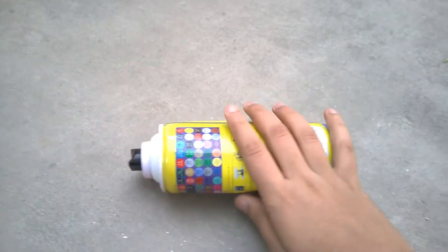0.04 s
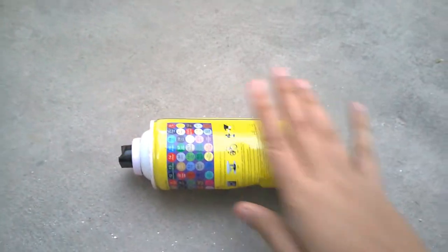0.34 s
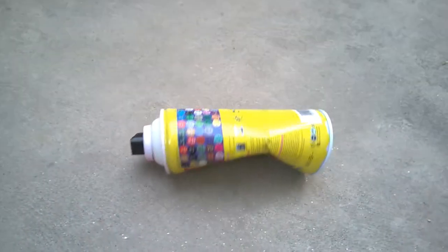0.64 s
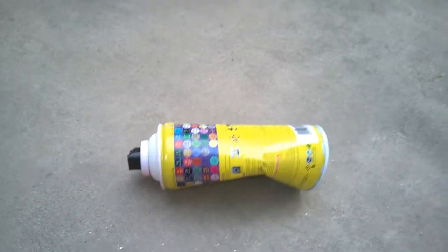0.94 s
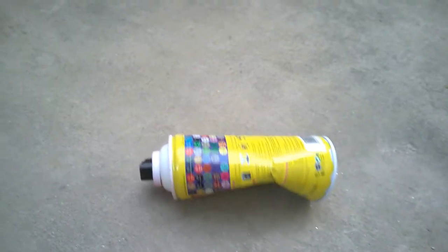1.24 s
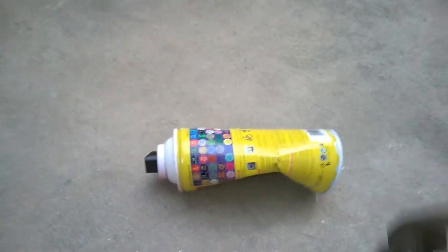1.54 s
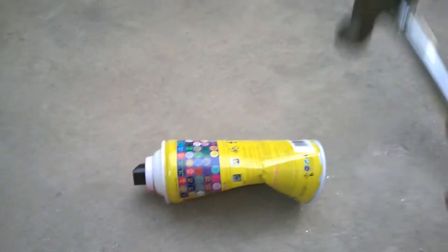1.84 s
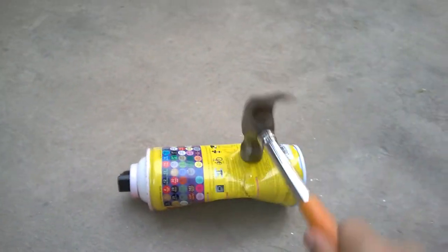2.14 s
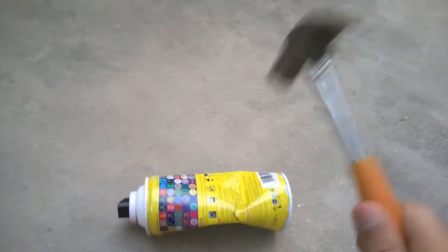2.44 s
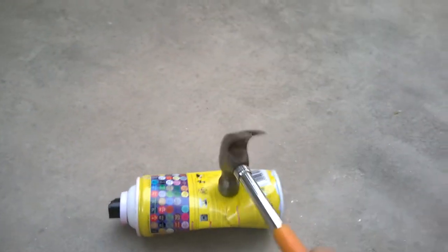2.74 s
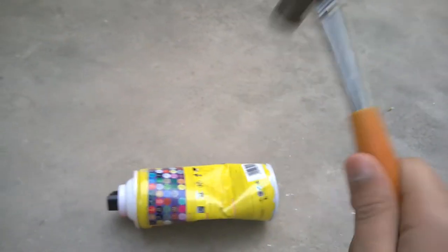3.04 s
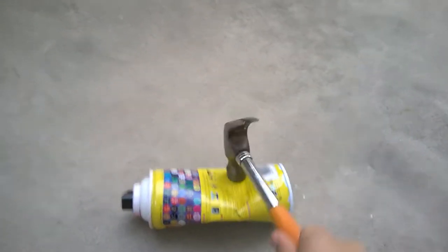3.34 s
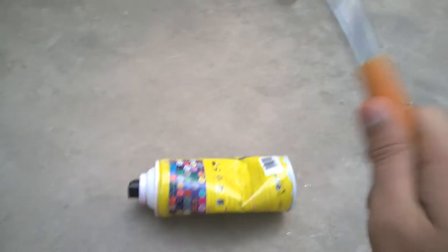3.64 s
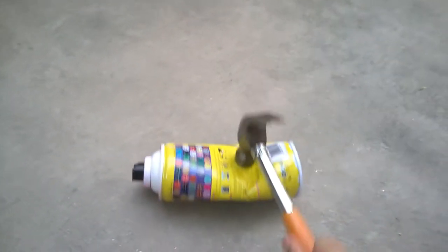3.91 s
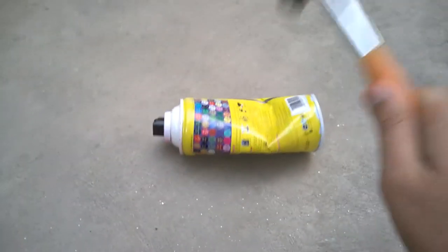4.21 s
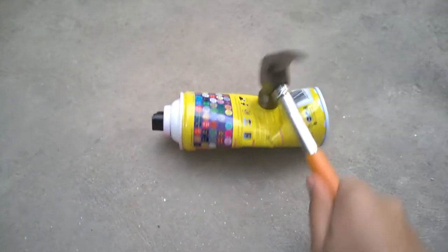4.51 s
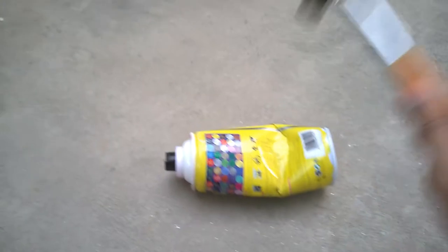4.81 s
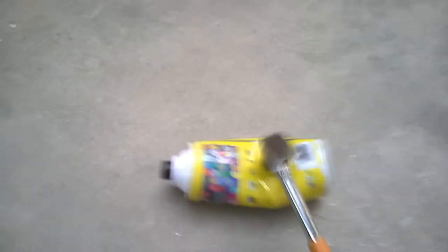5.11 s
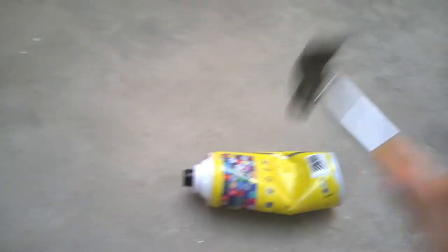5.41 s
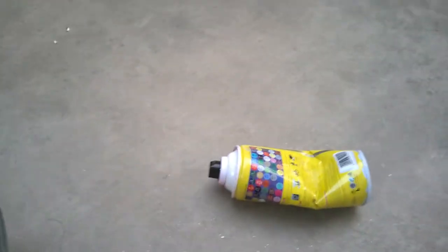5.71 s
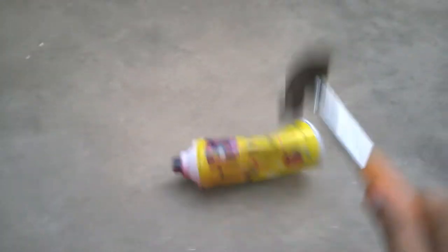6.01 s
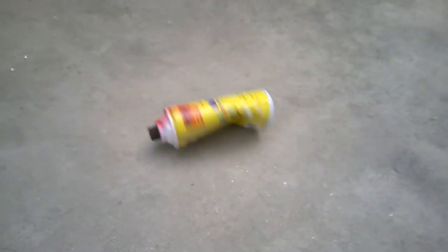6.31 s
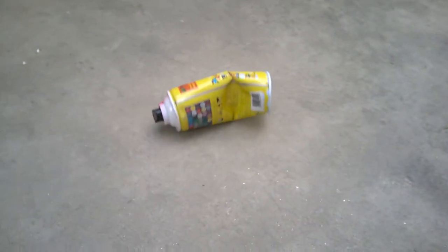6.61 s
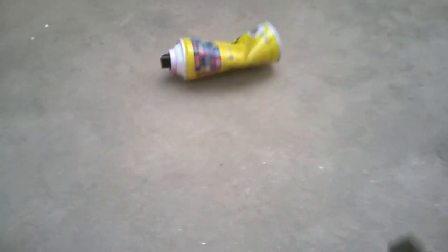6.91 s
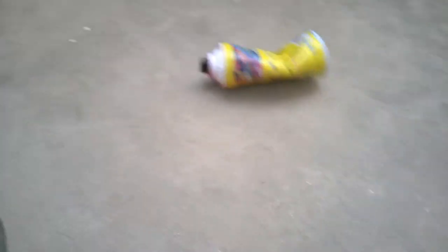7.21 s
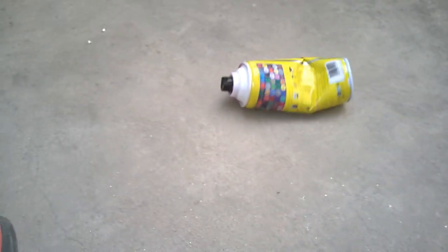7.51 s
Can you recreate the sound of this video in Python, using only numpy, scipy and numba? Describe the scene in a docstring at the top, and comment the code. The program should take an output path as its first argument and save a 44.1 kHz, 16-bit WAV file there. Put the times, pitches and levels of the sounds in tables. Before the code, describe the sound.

Seven close, sharp hammer blows dent a hollow metal spray can on a concrete floor, following a few light clinks as it settles. Each hit clunks and crumples, and the can bounces with a tinny rattle whose ring changes as it is crushed. Finally it rolls and knocks away while a little gas leaks softly. Hard surroundings echo briefly, and a draught rumbles on the microphone throughout.

```python
"""Hammering a spray can

A hammer strikes a nearly empty spray can seven times on concrete, close by. Each blow buckles the thin
wall; the can hops, clatters and at last tumbles away, ringing differently as it is crushed. The last
blow splits it and gas hisses out. Hard walls answer briefly, air rumbles on the microphone, and a
limiter holds the peaks."""
import sys
import numpy as np
from scipy import signal
from scipy.fft import rfft, irfft
from scipy.io import wavfile
from scipy.ndimage import uniform_filter1d, minimum_filter1d
from numba import njit

SR = 44100
rng = np.random.default_rng(int(sys.argv[2]) if len(sys.argv) > 2 else 0)


def bounce(signal):
    """Save signal as a 16-bit WAV file at the path given by the first command-line argument."""
    frames = np.transpose(np.atleast_2d(signal))
    limited = np.clip(frames, -1, 1)
    pcm = np.round(limited * 32767).astype(np.int16)
    wavfile.write(sys.argv[1], SR, pcm)


N = 341775
HIT_N, ATTACK_N = int(0.6 * SR), int(0.02 * SR)
HIT_T = np.arange(HIT_N) / SR

# hammer blows: start_s, crack_db, buckle_db, roar_db, roar_t60_s, thump_db
BLOWS = [(2.1273, -22, -19.5, -16.5, 0.43, -39), (2.6684, -15.5, -23, -17.5, 0.7, -32),
         (3.25, -15.5, -21.5, -12, 0.6, -32), (3.8536, -12.5, -21.5, -13.5, 0.59, -26),
         (4.4850, -19.5, -17.5, -14, 0.54, -31.5), (5.1257, -10, -16.5, -19.5, 1, -41),
         (5.9266, -11.5, -15.5, -21, 0.75, -18.5)]
# spectrum of steel hitting the wall: freq_hz, level_db
CRACK_SPECTRUM = [(60, -24), (160, -19), (400, -6.5), (650, -4), (870, 4), (1100, 4.5), (1400, -2),
                  (2500, -5), (4500, -22.5), (7000, -20), (9500, -40), (15000, -55)]
# spectrum of the shaken can and surroundings: freq_hz, level_db
ROAR_SPECTRUM = [(60, -25.5), (160, -4.5), (400, -9), (600, -5.5), (850, 0.5), (1600, -2), (3000, -3.5),
                 (4800, -11), (7200, -10), (9500, -23), (15000, -37.5)]
# boom of the whole can: pitch_hz, level_db, t60_s
HOLLOW_MODES = [(796, -13.5, 0.071), (888, -10.5, 0.13)]


def hammer_blows(touch_db=-4, buckle_t60_s=0.17, roar_rise_s=0.048, boom_db=-9):
    """Steel cracks on the wall, which folds in a burst of snaps; the can booms, the floor thumps."""
    out = np.zeros(N)
    for start_s, crack_db, buckle_db, roar_db, roar_t60_s, thump_db in BLOWS:
        force = unit_energy(burst(t60_s=0.023))
        force[0] += undb(touch_db)
        folds = clicks(per_s=450, spread_db=12.5) * fade(buckle_t60_s)
        snaps = signal.fftconvolve(folds, burst(t60_s=0.011))[:HIT_N]
        roar = colour(noise(), ROAR_SPECTRUM)
        roar = roar / rms(roar) * fade(roar_t60_s) * (1 - np.exp(-HIT_T / roar_rise_s))
        dull = band(roar, 3500, "low", order=1)
        roar = dull + (roar - dull) * fade(t60_s=0.81)  # treble dies first
        thump = band(burst(t60_s=0.13), [100, 235], "band", order=2)
        add(out, start_s, set_attack(colour(force, CRACK_SPECTRUM), crack_db))
        add(out, start_s, set_attack(colour(snaps, ROAR_SPECTRUM), buckle_db))
        add(out, start_s, undb(roar_db) * roar)
        add(out, start_s, set_attack(thump, thump_db))
        add(out, start_s, set_attack(ring(HOLLOW_MODES), crack_db + boom_db))
    return out


# wall bottoming out: start_s, clunk_db, judder_db
CLUNKS = [(2.1585, -19.5, -23), (2.6998, -14, -19.5), (3.282, -15, -19), (3.8915, -10.5, -24),
          (4.5116, -27.5, -15.5), (5.156, -28.5, -19), (5.942, -42, -28)]
# wall pinched between hammer and floor: pitch_hz, level_db, t60_s
PINCHED_MODES = [(692, -0.5, 0.021), (913, 0.5, 0.039), (1130, 3, 0.013), (1400, 0, 0.028),
                 (1653, 3, 0.029), (2100, -17, 0.013), (2740, -4.5, 0.026)]


def clunks(press_s=0.0064):
    """The hammer drives the folded wall onto the floor; it gives way in a few quick steps."""
    out = np.zeros(N)
    for start_s, clunk_db, _ in CLUNKS:
        press = clicks(per_s=3000, spread_db=5.5) * np.exp(-(HIT_T / press_s) ** 2)
        press[0] += 1
        clunk = signal.fftconvolve(ring(PINCHED_MODES), press)[:HIT_N]
        add(out, start_s, set_attack(clunk, clunk_db))
    return out


def crumple(t60_s=0.39, peak_db=-15, sheet_db=-2):
    """After each clunk the folds spring back in sparse creaks that briefly ring the bent sheet."""
    out = np.zeros(N)
    for start_s, _, _ in CLUNKS:
        wall = ring(WALL_MODES[damage_stage(start_s)], scatter_db=4, detune=0.025)
        crease = unit_energy(wall * fade(t60_s=0.066)) + sheet_ring(sheet_db, t60_s=0.031)
        slips = clicks(per_s=110, spread_db=21) * fade(t60_s)
        creaks = signal.fftconvolve(slips, crease)[:HIT_N]
        add(out, start_s, undb(peak_db) * creaks / np.max(np.abs(creaks)))
    return out


# can hitting floor or hammer: start_s, level_db, edge_db (positive on the rim, negative on the side)
LANDINGS = [(0.3722, -25, 9), (0.781, -52.5, -2), (1.027, -26.5, 9.5), (1.141, -32, 8), (1.879, -35, 8),
            (2.178, -28.5, 7), (2.77, -23, 3.5), (2.85, -22, 2.5), (2.881, -20, -8.5), (2.9124, -27.5, -16),
            (2.939, -28.5, -9), (3.265, -23, 5), (3.4105, -28, 14), (3.445, -26.5, -4), (3.624, -27, 1),
            (3.752, -43.5, -1.5), (3.986, -27.5, 13.5), (4.0285, -22, 16), (4.1664, -13.5, -3),
            (4.244, -18, -3), (4.281, -14.5, -10), (4.318, -19, 0), (4.583, -26, 7), (4.609, -23.5, -5),
            (4.6404, -18, -2), (4.671, -23, 4.5), (4.7194, -10, -3.5), (4.811, -26, -3.5), (4.888, -22, -4),
            (4.955, -30.5, -6), (5.023, -17, 4), (5.098, -23, 11), (5.2372, -18.5, 3), (5.2818, -26, 6),
            (5.32, -26.5, 13), (5.332, -18, 3.5), (5.4014, -19.5, 0), (5.4258, -23.5, -3),
            (5.452, -24.5, 1.5), (5.54, -26.5, -5.5), (5.5738, -30.5, -5.5), (5.6225, -25, 0.5),
            (5.757, -41, 5), (5.8234, -25.5, 5), (5.9749, -20.5, 2.5), (6.02, -14, 3.5), (6.064, -29, -17),
            (6.076, -19, 6), (6.118, -23, 3), (6.2016, -18, 4), (6.3091, -23.5, 4.5), (6.358, -28, -4),
            (6.378, -18, 7.5), (6.478, -28, 6.5), (6.546, -37, 11.5), (6.751, -46.5, -8), (6.963, -30, 0.5),
            (7.3673, -23.5, 1), (7.4253, -28, -6.5), (7.458, -28, -0.5), (7.503, -35.5, -4),
            (7.6111, -26, 5.5), (7.661, -30, 12.5), (7.697, -25.5, 6.5)]
# can rolling over its creased edge: start_s, level_db, edge_db, skid_s
ROLLS = [(6.168, -27, 0, 0.06), (6.832, -32, -4.5, 0.052), (6.907, -31.5, 0.5, 0.026),
         (7.0885, -30.5, -1, 0.022), (7.305, -27, -6.5, 0.02)]
STAGE_SKID_S = [0.009, 0.0063, 0.0079, 0.011]  # for a landing at firm_db


def clatter(firm_db=-24, skid_doubling_db=21.5, rebound_s=0.014, rebound_loss_db=10.5, gain_db=-1.22):
    """The can hops, rolls and judders under the hammer; softer landings skid longer."""
    out = np.zeros(N)
    for start_s, level_db, edge_db in LANDINGS:
        stretch = 2 ** ((firm_db - level_db) / skid_doubling_db)
        skid_s = STAGE_SKID_S[damage_stage(start_s)] * stretch
        add(out, start_s, knock(start_s, level_db, edge_db, skid_s))
    for start_s, level_db, edge_db, skid_s in ROLLS:
        add(out, start_s, knock(start_s, level_db, edge_db, skid_s))
    for start_s, _, judder_db in CLUNKS:
        for gap_s in rebound_s * np.exp(0.25 * rng.standard_normal(3)):
            add(out, start_s, knock(start_s, judder_db, edge_db=-1.5, skid_s=0.0051))
            start_s += gap_s
            judder_db -= rebound_loss_db
    return out * undb(gain_db)


# wall in four stages of damage: pitch_hz, level_db, t60_s
WAISTED_MODES = [(867, -7, 0.069), (1350, -11, 0.2), (1540, -13, .2), (1682, -3, 0.17), (1710, -9, 0.07),
                 (1970, -12, 0.15), (1925, -11, 0.23), (2200, -32, 0.21), (2414, -18, .17),
                 (2570, -9, 0.15), (2746, -6, 0.17), (3050, -13, 0.29), (3230, -15, 0.22), (3550, -21, 0.3),
                 (3850, -4.5, 0.12), (4100, -15, 0.11)]
DENTED_MODES = [(920, -22, 0.047), (1040, -4.5, 0.094), (1106, 1.5, 0.14), (1304, -4.5, 0.26),
                (1398, -7, 0.09), (1535, -2.5, 0.16), (1650, -2.5, 0.1), (1920, 0, 0.16), (2315, -5.5, 0.4),
                (2400, -21, 0.65), (2550, -23, 0.28), (2860, -4.5, 0.22), (2970, -8.5, 0.29),
                (3100, -20, 0.13), (3400, -11.5, 0.4), (3760, -14, 0.4), (3930, -38, 0.21),
                (5030, -15.5, 0.21), (5120, -33, 0.28)]
CREASED_MODES = [(667, -7, 0.16), (1008, 4.5, 0.071), (1040.6, 0, 0.14), (1320, -29, 0.21),
                 (1386, -11.5, 0.14), (1710, -11.5, 0.35), (1850, -22, 0.23), (2350, -4.5, 0.15),
                 (2760, -9.5, 0.24), (2960, -7.5, 0.26), (3110, -28, 0.24), (3530, -13.5, 0.33),
                 (4040, -11, 0.29), (5800, -11, 0.1), (6000, -29, 0.16), (6500, -32, 0.18)]
CRUSHED_MODES = [(582, 4, 0.058), (914, 2, 0.11), (983, 6, 0.13), (1008, 2.5, 0.078), (1358, -7.5, 0.29),
                 (1402, -4.5, 0.62), (1560, -12.5, 0.26), (1746, -4, 0.3), (1680, -30, 0.74),
                 (1990, -20, 0.25), (2170, -1, 0.2), (2180, -11, 0.54), (2275, -2, 0.3), (2420, -15, 0.57),
                 (2770, -9, 0.6), (2890, -10, 0.22), (2920, -25, 0.19), (3580, -13, 0.48), (3990, -7, 0.15),
                 (4240, -6, 0.14), (4590, -15, 0.72), (4770, -31, 0.22), (5350, -26, 0.28),
                 (6130, -12, 0.23), (6300, -27, 0.26), (7000, -30, .16)]
WALL_MODES = [WAISTED_MODES, DENTED_MODES, CREASED_MODES, CRUSHED_MODES]
DAMAGE_TIMES_S = [2.0, 5.12, 5.92]
# stiff domed base, alike in all stages: pitch_hz, level_db, t60_s
DOME_MODES = [(6336, -13.5, 0.091), (6900, -17.5, 0.14), (7500, -48, 0.11), (7520, -16.5, 0.16)]
# knock bands, one row per stage: thud_db, body_db, ring_db, tick_db
STAGE_BALANCE = [(-15.5, 0.5, -1, -15), (-21.5, -1, -2.5, -10.5), (-14, 2.5, -3.5, -9.5),
                 (-7.5, 2, -2.5, -10.5)]
EDGE_TILT = [-0.15, -0.49, 0.23, 0.67]  # band dB per edge_db


def knock(start_s, level_db, edge_db, skid_s, chatter_db=-9, chatter_ref_s=0.0031):
    """One contact rings wall and base repeatedly as the can skids on grit; rim ticks, side booms."""
    stage = damage_stage(start_s)
    sheet = sheet_ring(-9, t60_s=0.038) + sheet_ring(-6, t60_s=0.25)
    chatter = unit_energy(clicks(per_s=2500, spread_db=20.5) * np.exp(-HIT_T / skid_s))
    force = chatter * undb(chatter_db) * skid_s / chatter_ref_s
    force[0] += 1
    shell = unit_energy(ring(WALL_MODES[stage] + DOME_MODES)) + sheet
    sound = signal.fftconvolve(shell[:HIT_N // 2], force[:4 * ATTACK_N])
    sound = band(sound, 400, "high", order=2)  # a small shell radiates little bass
    bands_db = level_db + np.array(STAGE_BALANCE[stage]) + edge_db * np.array(EDGE_TILT)
    return balance(sound, bands_db)


def damage_stage(time_s):
    """How far the can is crushed, 0 to 3."""
    return np.searchsorted(DAMAGE_TIMES_S, time_s)


def balance(x, bands_db, edges_hz=(300, 750, 1450, 4200, 15000), centres_hz=(560, 1050, 2400, 6000)):
    """Bring the attack's thud, body, ring and tick bands toward their levels in two passes."""
    for _ in range(2):
        band_rms = [rms(band(x[:ATTACK_N], hz, "band")) for hz in zip(edges_hz, edges_hz[1:])]
        gains_db = bands_db - 20 * np.log10(band_rms)
        x = colour(x, list(zip(centres_hz, gains_db)))
    return x


def ring(modes, scatter_db=2.6, detune=0.0016, early_db=2, early_t60_s=0.058):
    """Each point of contact favours different modes; the floor damps the first swing quickly."""
    pitch_hz, level_db, t60_s = np.transpose(modes)
    level_draw, pitch_draw = rng.standard_normal((2, len(modes)))
    gains = undb(level_db + scatter_db * level_draw) * rng.choice([-1, 1], len(modes))
    t = HIT_T[:HIT_N // 2]
    swings = np.sin(2 * np.pi * np.outer(pitch_hz * (1 + detune * pitch_draw), t))
    decays = np.exp(-np.log(1000) * np.outer(1 / t60_s, t))
    tones = np.pad(gains @ (swings * decays), (0, HIT_N - len(t)))
    return tones * (1 + undb(early_db) * fade(early_t60_s))


# sheet metal spectrum: freq_hz, level_db
SHEET_SPECTRUM = [(100, -13.5), (300, -24), (600, -4.5), (1000, -6), (2800, 5), (4600, -4.5), (7200, -7.5),
                  (8500, -15), (10000, -25.5), (14000, -37), (16000, -51)]


def sheet_ring(level_db, t60_s):
    """The dense modes of thin metal blur into noise: a tick when short, a ring when long."""
    return undb(level_db) * unit_energy(colour(burst(t60_s), SHEET_SPECTRUM))


# hammer grazing the floor: start_s, level_db
PICKUP_TICKS = [(1.303, -56), (1.327, -52.5), (1.388, -46), (1.403, -52)]
# hammer head: pitch_hz, level_db, t60_s
STEEL_MODES = [(2180, 1, 0.23), (4140, 6, 0.058), (5970, -1, .08), (7960, -2, 0.065), (13150, -19, .1)]


def hammer_pickup(drag_peak_s=1.383, drag_width_s=0.072, drag_db=-47, grit_db=-4):
    """The steel head drags and ticks on the concrete as it is lifted."""
    t = np.arange(N) / SR
    drag = band(rng.standard_normal(N), [350, 950], "band", order=2)
    out = undb(drag_db) * drag / rms(drag) * np.exp(-((t - drag_peak_s) / drag_width_s) ** 2)
    for start_s, level_db in PICKUP_TICKS:
        tick = unit_energy(ring(STEEL_MODES)) + sheet_ring(grit_db, t60_s=0.06)
        add(out, start_s, set_attack(tick, level_db))
    return out


# floor grit spectrum: freq_hz, level_db
GRIT_SPECTRUM = [(200, -10), (450, 6), (850, 5), (1500, -2), (2300, -4), (3100, 0), (4500, -10),
                 (7000, -15.5), (9500, -37.5), (15000, -38)]


def rocking(start_s=0.59, length_s=1.23, level_db=-53.5, grains_per_s=1500, wall_db=-3, uneven_db=2):
    """Grit crunches under the rocking can and faintly rings its wall, swelling and dying away."""
    sizes = rng.choice([-1, 1], N) * undb(-14 * rng.random(N))
    grains = colour(sizes * (rng.random(N) < grains_per_s / SR), GRIT_SPECTRUM)
    wall = signal.fftconvolve(grains, ring(WAISTED_MODES))[:N]
    crunch = grains / rms(grains) + undb(wall_db) * wall / rms(wall)
    progress = np.clip((np.arange(N) / SR - start_s) / length_s, 0, 1)
    swell = np.sqrt(np.abs(np.sin(np.pi * progress)))
    return crunch * swell * undb(level_db + uneven_db * wander(per_s=7.77))


# gas jet spectrum: freq_hz, level_db
JET_SPECTRUM = [(1000, -3), (7200, -3), (9500, -13), (13000, -19), (15000, -21)]


def gas_leak(start_s=6.23, rise_s=0.19, spurt_t60_s=1.26, spurt_db=-48.5, seep_db=-60.5):
    """The remaining gas spurts from the split wall, then seeps."""
    hiss = colour(rng.standard_normal(N), JET_SPECTRUM)
    age_s = np.maximum(np.arange(N) / SR - start_s, 0)
    opening = np.minimum(age_s / rise_s, 1)
    spurt = undb(spurt_db) * np.exp(-np.log(1000) * np.maximum(age_s - rise_s, 0) / spurt_t60_s)
    return hiss / rms(hiss) * opening * (spurt + undb(seep_db))


def wall_echo(x, wet_db=-12, low_t60_s=0.41, high_t60_s=0.26, split_hz=2400, build_s=0.0073):
    """Short diffuse echo of the hard surroundings; the treble dies first."""
    low = band(noise(), split_hz, "low", order=2) * fade(low_t60_s)
    high = band(noise(), split_hz, "high", order=2) * fade(high_t60_s)
    response = unit_energy((low + high) * (1 - np.exp(-HIT_T / build_s)))
    return undb(wet_db) * signal.fftconvolve(x, response)[:N]


# background air spectrum: freq_hz, level_db
AIR_SPECTRUM = [(12, -14), (22, 1), (32, 2), (50, -4.5), (75, -4.5), (100, -14.5), (160, -12.5), (205, -21),
                (270, -24.5), (420, -33), (900, -35), (1500, -38.5), (2500, -42.5), (3500, -49),
                (5000, -54.5), (7200, -58.5), (8500, -76), (10000, -73.5), (16000, -76)]
# draught on the microphone: time_s, level_db
RUMBLE_LEVELS = [(0.0, -34.5), (0.3, -27.5), (0.45, -38.5), (0.93, -29.5), (1.6, -28.5), (1.64, -32),
                 (7.62, -35.5), (7.75, -34)]


def air(split_hz=110, gust_db=0.5, drone_db=-5, distant_db=-41, sag_db_per_s=0.35):
    """A gusty draught rumbles on the microphone over a distant drone and faint hiss."""
    t = np.arange(N) / SR
    rumble = band(colour(rng.standard_normal(N), AIR_SPECTRUM, size=16384), split_hz, "low")
    hiss = band(colour(rng.standard_normal(N), AIR_SPECTRUM, size=16384), split_hz, "high")
    drone = band(rng.standard_normal(N), [122, 165], "band", order=3)
    distant = hiss / rms(hiss) + undb(drone_db) * drone / rms(drone)
    rumble_db = np.interp(t, *np.transpose(RUMBLE_LEVELS)) + gust_db * wander(per_s=6.6)
    return rumble / rms(rumble) * undb(rumble_db) + distant * undb(distant_db - sag_db_per_s * t)


def undb(db):
    """Decibels to gain."""
    return 10 ** (np.asarray(db) / 20)


def rms(x):
    """Root mean square."""
    return np.sqrt(np.mean(x ** 2) + 1e-18)


def unit_energy(x):
    """Scale to unit energy."""
    return x / (rms(x) * np.sqrt(len(x)))


def set_attack(x, level_db):
    """Scale a hit by the RMS of its attack."""
    return undb(level_db) * x / rms(x[:ATTACK_N])


def fade(t60_s):
    """Exponential decay, one hit long."""
    return np.exp(-np.log(1000) * HIT_T / t60_s)


def noise():
    """White noise, one hit long."""
    return rng.standard_normal(HIT_N)


def burst(t60_s):
    """Decaying white noise."""
    return noise() * fade(t60_s)


def clicks(per_s, spread_db):
    """Sparse clicks of random sign and size, one hit long."""
    fires = rng.random(HIT_N) < per_s / SR
    return fires * rng.choice([-1, 1], HIT_N) * undb(-spread_db * rng.random(HIT_N))


def wander(per_s):
    """Slow random drift with a spread near 1."""
    step = int(SR / per_s)
    held = np.repeat(rng.standard_normal(200), step)[:N]
    return 1.2 * uniform_filter1d(held, step)


def add(track, start_s, x):
    """Mix x into the track."""
    i = int(start_s * SR)
    track[i:i + len(x)] += x[:len(track) - i]


def band(x, hz, kind, order=4):
    """Butterworth filter."""
    return signal.sosfilt(signal.butter(order, hz, kind, fs=SR, output="sos"), x)


def colour(x, points, size=2048):
    """Minimum-phase filter through (freq_hz, level_db) points."""
    freq_hz, level_db = np.transpose(points)
    grid_hz = np.maximum(np.arange(size // 2 + 1) * SR / size, 1)
    gains = undb(np.interp(np.log(grid_hz), np.log(freq_hz), level_db))
    cepstrum = irfft(np.log(gains))
    cepstrum[1:size // 2] *= 2
    cepstrum[size // 2 + 1:] = 0
    return signal.fftconvolve(x, irfft(np.exp(rfft(cepstrum))))[:len(x)]


@njit
def peak_envelope(x, release):
    """Instant rise, exponential fall."""
    out, peak = np.empty(len(x)), 0.
    for i in range(len(x)):
        peak = max(abs(x[i]), peak * release)
        out[i] = peak
    return out


def scene():
    """Hammer and can, their echo, leaking gas and air, in mono."""
    metal = hammer_blows() + clunks() + crumple() + clatter() + hammer_pickup() + rocking()
    return (metal + wall_echo(metal) + gas_leak() + air())[None]


def record(dry, ceiling=0.64, release_s=0.013, cutoff_hz=15800):
    """A fast look-ahead limiter holds the peaks; a steep low-pass cuts the top."""
    peaks = peak_envelope(dry[0], np.exp(-1 / (release_s * SR)))
    gain = ceiling / np.maximum(peaks, ceiling)
    gain = uniform_filter1d(minimum_filter1d(gain, size=45), size=45)
    lowpass = signal.ellip(8, 0.2, 70, cutoff_hz, fs=SR, output="sos")
    return signal.sosfilt(lowpass, dry * gain)


dry = scene()
out = record(dry)
bounce(out)
```